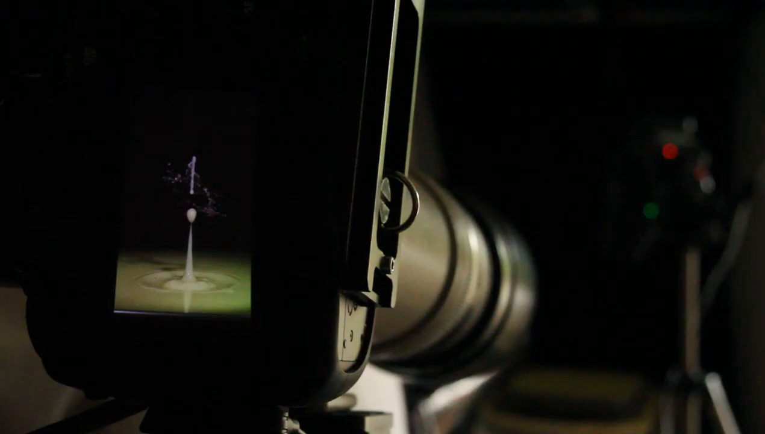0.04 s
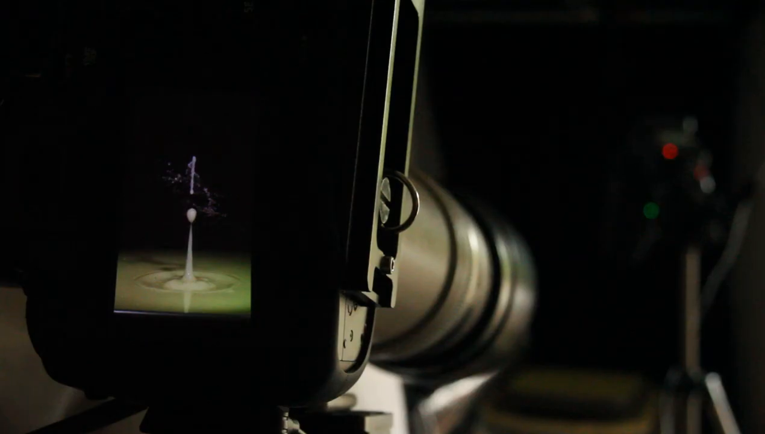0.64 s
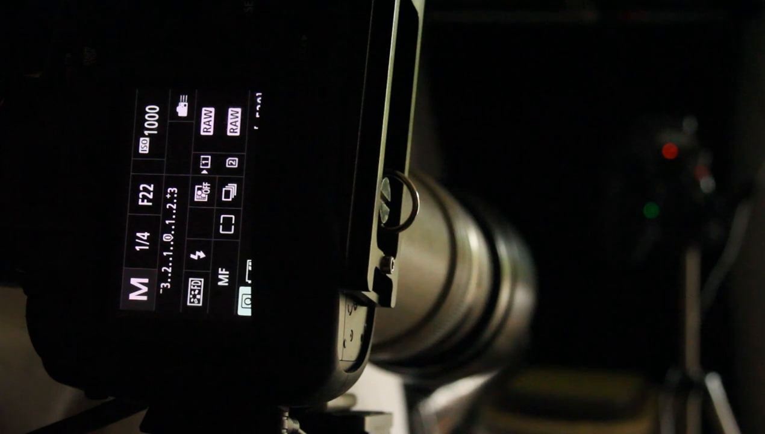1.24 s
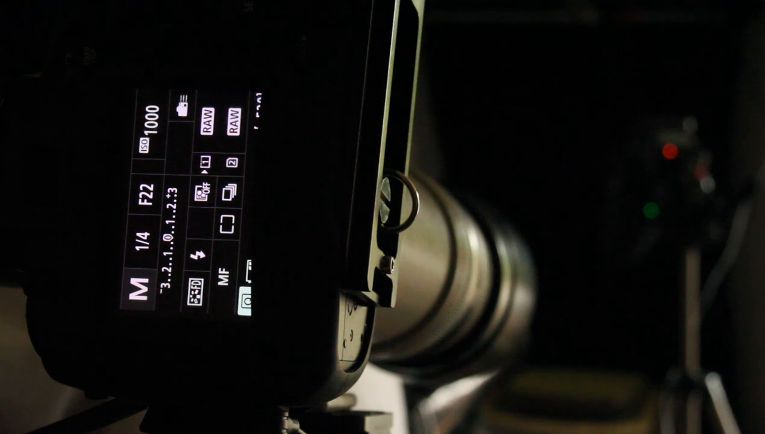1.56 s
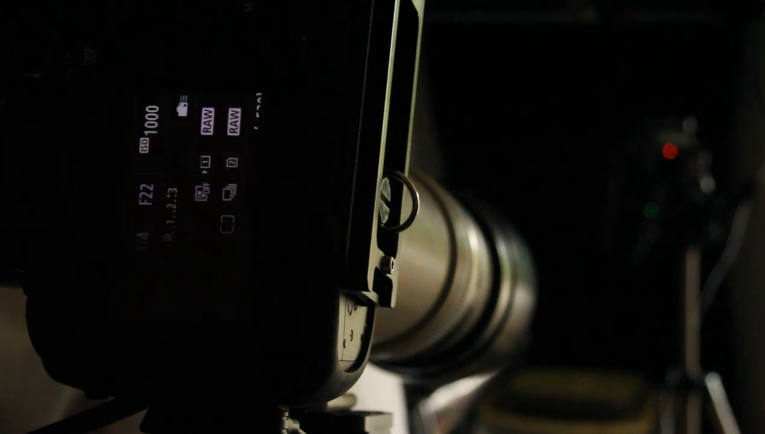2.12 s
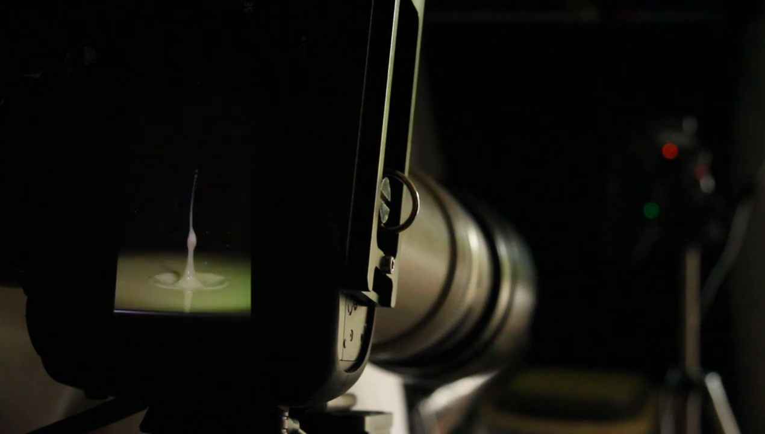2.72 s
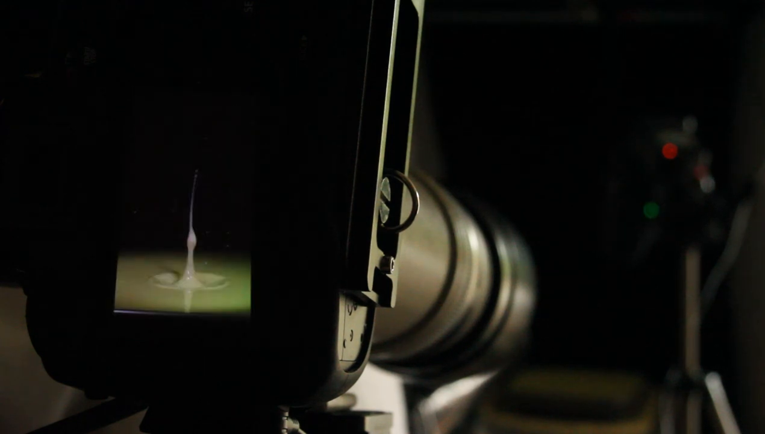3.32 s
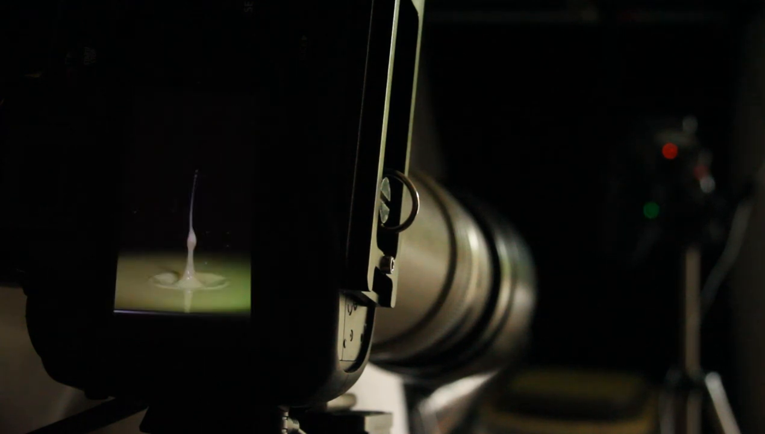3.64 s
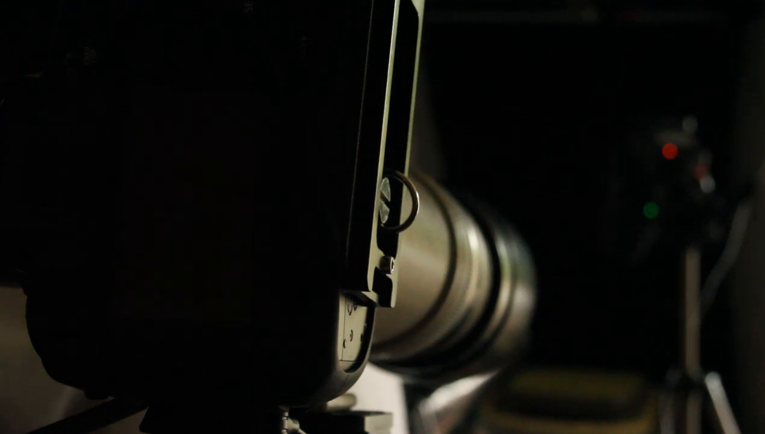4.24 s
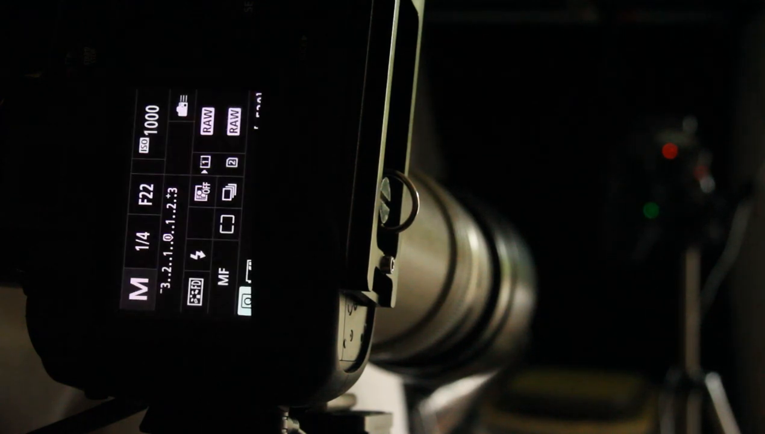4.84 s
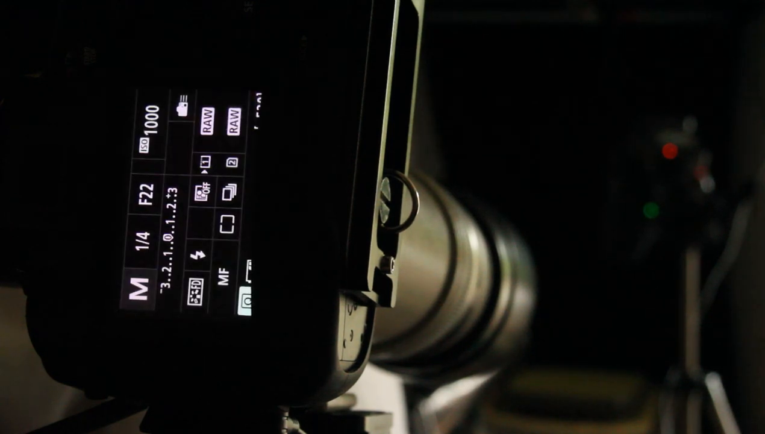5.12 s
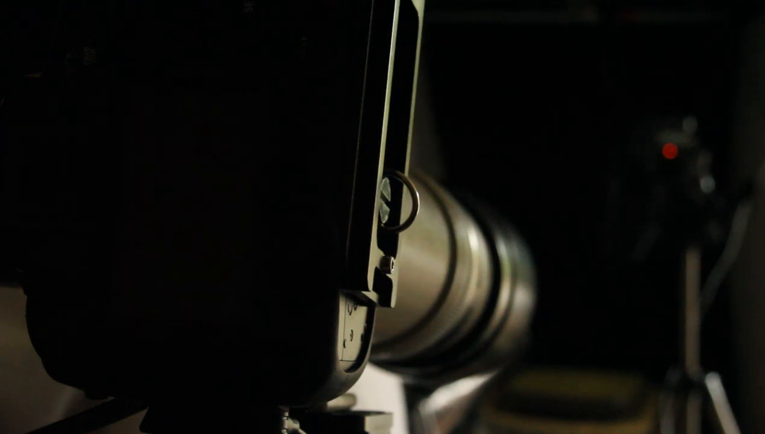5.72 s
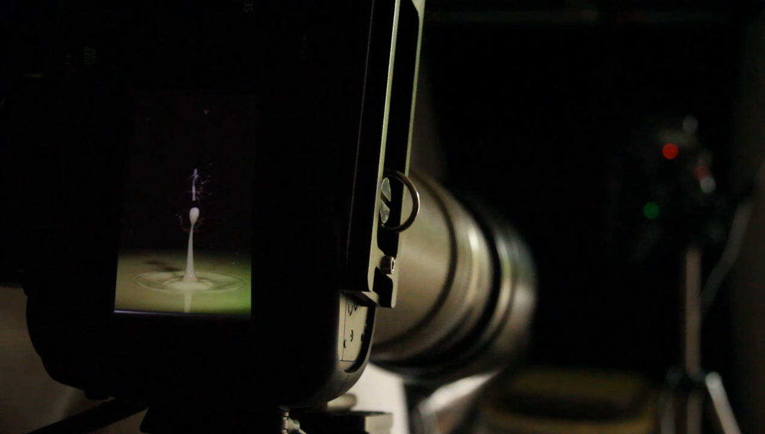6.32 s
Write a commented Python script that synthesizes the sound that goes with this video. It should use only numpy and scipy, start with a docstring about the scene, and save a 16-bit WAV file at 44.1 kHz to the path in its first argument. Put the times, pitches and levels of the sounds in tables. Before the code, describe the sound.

Two rounds of quick, sharp mechanical clicks from a solenoid valve and a camera's mirror and shutter, over faint room hiss.

```python
"""A quiet room hisses, electronics whine faintly, and something rustles as it is handled.
Then a water-drop photo rig fires twice. Each time, the spring of a trigger switch pings, and a
solenoid valve (a plunger pulled by a magnet) snaps open and falls softly shut for each of two drops.
A reflex camera throws up its mirror, runs its shutter and resets: its parts hit each other, crack
through the case and ring. Two soft bumps come at the end."""
import sys
import numpy as np
from scipy import signal
from scipy.fft import rfft, irfft
from scipy.io import wavfile
from scipy.ndimage import uniform_filter1d

SR = 44100
rng = np.random.default_rng(int(sys.argv[2]) if len(sys.argv) > 2 else 0)


def master_out(mix):
    """Clip the mix to full scale and print it as 16-bit PCM to the path in sys.argv[1]."""
    frames = np.transpose(np.atleast_2d(mix))
    ceiling = np.clip(frames, -1, 1)
    pcm = np.round(ceiling * 32767).astype(np.int16)
    wavfile.write(sys.argv[1], SR, pcm)


N = 289428
RING_TIME = np.arange(SR // 2) / SR   # seconds since a blow

# A colour says how strong each pitch is. A mode is one note a part rings at; t60 is its time to fade 60 dB.
# echoes from nearby surfaces (delay [s], level [dB])
ROOM_ECHOES = [(.0019, -4), (.0024, -7), (.0051, -10), (.0062, -5), (.0067, -9), (.0086, -11)]
# how long the room rings (frequency [Hz], t60 [s])
ROOM_DECAY = [(150, 0.14), (500, 0.18), (1500, 0.22), (4000, 0.15), (9000, 0.17), (15000, 0.15)]
# room air and hiss (frequency [Hz], level [dB])
AIR_COLOUR = [(25, -12), (45, -8), (80, -4), (110, -7), (170, -2.5), (250, 0), (450, -3), (620, -2.5),
              (900, -5), (2000, -8), (3400, -7.5), (5000, -10.5), (10000, -13.5), (14000, -19),
              (16000, -21)]
# the room's low rumble (low edge [Hz], high edge [Hz], level [dB])
RUMBLE_BANDS = [(220, 300, -77), (300, 400, -77.5), (400, 500, -76.5), (540, 680, -78)]
# whine of the electronics (frequency [Hz], level [dB])
WHINE_TONES = [(3008, -73.5), (15644, -84)]

# how the rustle rises and falls (time [s], level [dB])
RUSTLE_LEVELS = [(.4, -76), (.65, -65.5), (.82, -66), (1, -73), (1.1, -67), (1.3, -76), (1.48, -73),
                 (1.57, -62), (1.62, -72)]
# the handled thing snags (time [s], level [dB])
RUSTLE_SNAGS = [(.676, -36), (0.863, -34.5), (.947, -38), (1.07, -34)]
# colour of the rustle (frequency [Hz], level [dB])
RUBBING_COLOUR = [(150, -7), (600, -3), (1400, 5.5), (2300, 0.5), (3500, 1), (4500, -4), (9000, -1),
                  (15000, -14)]

# soft scuffs of handled plastic (time [s], level [dB])
SCUFFS = [(1.524, -49), (1.563, -49.5), (1.582, -50), (1.686, -48)]
# colour of the scuffs (frequency [Hz], level [dB])
SCUFF_COLOUR = [(200, 2), (600, 3), (1300, 4), (2400, -4), (3500, 8), (4300, 2), (9000, -3), (15000, -24)]
# the trigger switch is pressed (time [s], level [dB])
PRESSES = [(1.6118, -40), (4.8785, -43)]
# the switch's spring (frequency [Hz], level [dB], t60 [s])
SPRING_MODES = [(4000, -7.5, 0.15), (3900, 0, 0.009), (3300, 2, 0.007)]

# the valve opens to let a drop go (time [s], level [dB])
VALVE_OPENINGS = [(1.7128, -7.5), (1.8646, -8.5), (4.9925, -7.5), (5.143, -8)]
# colour of the valve's snap (frequency [Hz], level [dB])
SNAP_COLOUR = [(150, -31), (300, -15), (580, -18.5), (900, -16), (1200, -21.5), (1550, -16.5), (2300, -13),
               (3500, -8), (4600, -9.5), (6000, -4), (8800, -1.5), (10500, 0.5), (12300, -4), (13500, -12),
               (14500, -14), (16000, -29)]
# pitches the valve's housing boosts (frequency [Hz], width [Hz], boost [dB])
HOUSING_PEAKS = [(2230, 120, 7), (3560, 120, 5), (5850, 80, 5), (6450, 110, 7), (6900, 130, 6),
                 (8290, 60, 6), (8750, 220, 5), (9230, 110, 9), (10350, 90, 5), (10620, 80, 5),
                 (11000, 80, 6), (12200, 130, 8)]
# the valve's steel shell, knocked by the plunger (frequency [Hz], level [dB], t60 [s])
STEEL_SHELL_MODES = [(580, -34.5, 0.033), (1530, -45, 0.11), (2200, -44.5, 0.14), (2350, -39, .05),
                     (2595, -50, 0.088)]
# the arm holding the valve (frequency [Hz], level [dB], t60 [s])
ARM_MODES = [(327, -25.5, 0.055), (420, -37.5, 0.072)]
# colour of the plunger's tap on its rubber seat (frequency [Hz], level [dB])
TAP_COLOUR = [(150, -10), (600, 8), (900, 1.5), (1200, -2), (1550, 1), (3300, -4.5), (6000, -0.5),
              (14000, -31)]
# the rubber seat and its mount (frequency [Hz], level [dB], t60 [s])
RUBBER_SEAT_MODES = [(826, 0, 0.17), (590, 2, 0.059), (314, -5, 0.18), (1510, -13, .12)]

# photographs (mirror rises [s], camera resets [s], extra lever ring as the mirror rises [dB])
PHOTOS = [(2.124, 2.423, 3.5), (5.4394, 5.7409, 2)]
# parts sliding before they strike (frequency [Hz], level [dB])
SCRAPE_COLOUR = [(200, -15), (900, -6.5), (2500, -8), (3800, 4), (5500, 2), (9000, -3.5), (12000, -14),
                 (16000, -23)]
# A contact is one part hitting another. These six tables list them as
# (time [s], blow [dB], extra treble [dB], lever ring [dB], latch ring [dB]).
# Timed from the start of their own movement:
MIRROR_UP_CONTACTS = [(0, -10, 2, -16, -25), (.004, -11, 8, -19, -16), (.0075, -8, 1, -20, -22),
                      (0.0104, -5.5, 5.5, -21, -15.5), (0.0154, -10.5, -12, -37, -28),
                      (.0238, -14, -23, -45, -24)]
SHUTTER_OPEN_CONTACTS = [(0, -10, -30, -29, -49), (.0045, -5.5, -13, -28, -37), (.008, -7.5, -16, -32, -42),
                         (0.0131, -15, -16, -36, -38)]
SHUTTER_CLOSE_CONTACTS = [(0, -17, -2, -24, -22), (.0038, -12.5, 2, -24, -8)]
MIRROR_DOWN_CONTACTS = [(0, -7, 5.5, -29, -18), (.0028, -9.5, -14, -14, -15), (.006, -9, -8, -35, -19),
                        (0.0104, -17.5, -18, -34, -33), (.019, -13, -22, -43, -38)]
LAST_LATCH_CONTACTS = [(0, -21, -3, -42, -23), (.0047, -18.5, 1.5, -36, -39), (.0094, -19.5, -16, -50, -38)]
# Timed from the start of the scene: the cocking lever rattles as it readies the shutter again
COCKING_CONTACTS = [(2.429, -15, -5, -29, -19), (2.4304, -15, -8, -26, -19), (2.437, -19, -3, -16.5, -20),
                    (2.4424, -19, -6, -17, -24), (5.7455, -12, -7, -26, -21), (5.7488, -14, 0, -12.5, -19),
                    (5.755, -19, -12, -17, -20), (5.7595, -24, -10, -8.5, -30)]
# a small catch ticks while the shutter is open (same columns as COCKING_CONTACTS)
CATCH_CONTACTS = [(2.305, -47, 6, -60, -43), (5.583, -41, 10, -60, -39)]
# colour of the camera's case (frequency [Hz], level [dB])
CAMERA_COLOUR = [(50, -70), (105, -51), (160, -10), (250, -16.5), (350, -13), (480, -15.5), (680, -5.5),
                 (1000, -4.5), (1500, -5), (4000, -2.5), (7000, -1), (11000, .5), (13000, -5.5),
                 (16000, -29)]
# pitches the case boosts (frequency [Hz], width [Hz], boost [dB])
CAMERA_PEAKS = [(657, 35, 5), (2030, 50, 3), (2770, 60, 3), (3760, 100, 3), (4240, 60, 3), (4500, 120, 3),
                (4810, 110, 5), (5240, 60, 6), (5890, 150, 3), (8090, 60, 3), (8500, 60, 3), (9650, 90, 4),
                (10130, 90, 4), (10410, 60, 4)]
# camera parts that ring (frequency [Hz], level [dB], t60 [s])
MIRROR_LEVER_MODES = [(3696, -9, 0.015), (3920, -2.5, 0.014), (4160, -5, .012), (4800, -12, 0.017),
                      (5230, -8, 0.012)]
SMALL_LATCH_MODES = [(7740, -4, 0.01), (8540, -3.5, 0.01), (8740, -4.5, 0.013), (9300, -2, 0.0075)]
MIRROR_BOX_MODES = [(659, -28.5, 0.066), (3770, -27, 0.052), (10060, -20, 0.051)]   # as the mirror swings up
ROCKING_MODES = [(159, 4, 0.057), (207, 6, 0.046), (254, -0.5, 0.054)]   # the whole camera
SHUTTER_FRAME_MODES = [(580, 0, 0.11), (1000, -9, .09), (1045, -13, 0.21), (1175, -7, .12),
                       (2000, -1, 0.11), (2125, -7, .12), (2433, -9, .12), (4330, -5, .06)]
MIRROR_LANDING_MODES = [(2785, 0, .12), (4270, -4, .08), (5230, -2, .11), (9640, -3, .07)]   # the mirror, back on its stop
LAST_LATCH_MODES = [(3700, -11, .02), (4680, -13, .02), (4830, -13, .02), (8600, -5, .008),
                    (8850, -2, .009), (9080, -5, .008), (12900, -9, .008), (13400, -10, .008)]
SETTLING_MODES = [(690, -2, .07), (900, -2, .07), (1220, 0, .04), (1400, 0, .04), (2130, -1, .05),
                  (2330, -4, .05)]   # a dull knock as the mechanism settles
# the mirror jolts the camera as it starts and stops (delay [s], level [dB])
MIRROR_UP_JOLTS = [(.001, -39), (.019, -39)]
MIRROR_DOWN_JOLTS = [(0, -46), (.027, -45)]

# soft bumps near the rig (time [s], level [dB])
SOFT_BUMPS = [(6.303, -23), (6.518, -30)]
# their dull colour (frequency [Hz], level [dB])
THUD_COLOUR = [(100, -14), (400, 0), (850, -1), (1700, -5), (2400, -15), (8000, -32)]
# pitches the bumped thing boosts (frequency [Hz], width [Hz], boost [dB])
THUD_PEAKS = [(420, 70, 6), (800, 100, 4), (1650, 120, 6)]

MIRROR_DOWN_LAG_S, LATCH_LAG_S = .0255, .096   # after the camera's reset


def from_db(db):
    """Turn decibels into a number to multiply by."""
    return 10 ** (np.asarray(db) / 20)


def unit(x):
    """Scale a sound to an energy of one."""
    return x / np.sqrt(np.sum(x ** 2) + 1e-20)


def at_hz(points, hz):
    """Read between a table's rows, giving every octave equal space."""
    known_hz, values = np.transpose(points)
    return np.interp(np.log(hz + 0.00057), np.log(known_hz), values)


def dying(t60):
    """A fade that is 60 dB down after t60 seconds."""
    return np.exp(-np.log(1000) * RING_TIME / t60)


def rising(rise_s):
    """A swell from zero towards one."""
    return 1 - np.exp(-RING_TIME / rise_s)


def wander(rate_hz):
    """A smooth random drift with a spread of one."""
    width = round(SR / rate_hz)
    slow = uniform_filter1d(uniform_filter1d(rng.standard_normal(N), width), width)
    return slow / slow.std()


def add(track, s, sound):
    """Mix a sound into a track, starting at s seconds."""
    i = round(s * SR)
    track[i:i + len(sound)] += sound[:len(track) - i]


def through(x, response):
    """Pass a sound through an object or room, given its response to one click."""
    return signal.fftconvolve(x, response)[:len(x)]


def brighten(x, db, corner_hz):
    """Raise or lower the treble above corner_hz."""
    dull = signal.lfilter(*signal.butter(1, corner_hz, fs=SR), x)
    return dull + from_db(db) * (x - dull)


def body(colour, peaks=(), size=8192):
    """How an object answers one click: a broad colour with a few boosted pitches."""
    hz = np.arange(size // 2 + 1) * SR / size
    boost_db = sum(lift / (1 + (2 * (hz - centre) / width) ** 2) for centre, width, lift in peaks)
    cepstrum = irfft(np.log(from_db(at_hz(colour, hz) + boost_db)))[:size // 2]
    cepstrum[1:] *= 2   # minimum phase: nothing sounds before the blow
    return unit(irfft(np.exp(rfft(cepstrum, size))))


def ring(modes, rise_s):
    """A struck part's notes build up quickly, then fade."""
    notes = sum(from_db(db) * dying(t60) * np.sin(2 * np.pi * (hz * RING_TIME + rng.random()))
                for hz, db, t60 in modes)
    return rising(rise_s) * notes


def struck(events, modes, rise_s):
    """The same part rings at every (time, level) event."""
    out, sound = np.zeros(N), ring(modes, rise_s)
    for s, db in events:
        add(out, s, from_db(db) * sound)
    return out


def puffs(events, shape):
    """A fresh burst of noise, swelling and fading as shape does, at every (time, level) event."""
    out = np.zeros(N)
    for s, db in events:
        add(out, s, from_db(db) * unit(rng.standard_normal(len(shape)) * shape))
    return out


def crack(t60, size=1024):
    """The tiny rattle of one hard contact, about equally strong at all pitches."""
    decay = dying(t60)[:size]
    burst = rng.standard_normal(size) * decay
    limit = 1.5 * unit(decay)
    for _ in range(3):
        even = irfft(np.exp(1j * np.angle(rfft(burst))))   # level out the pitches
        burst = np.clip(even, -limit, limit)   # keep it fading
    return unit(burst)


def room(echo_db, tail_db, build_s, treble_db=0):
    """How the room answers a click: the click itself, nearby echoes and a tail fading band by band."""
    size, edges = len(RING_TIME), np.geomspace(60, 18000, 13)
    hz, white = np.fft.rfftfreq(size, 1 / SR), rfft(rng.standard_normal(size))
    tail = np.zeros(size)
    for low, high in zip(edges, edges[1:]):
        band = irfft(white * (hz >= low) * (hz < high), size)
        tail += band * dying(at_hz(ROOM_DECAY, np.sqrt(low * high)))
    response = brighten(from_db(tail_db) * unit(tail * rising(build_s)), treble_db, corner_hz=2520)
    response[0] += 1   # the direct sound
    for delay, db in ROOM_ECHOES:
        add(response, delay, from_db(db + echo_db) * crack(t60=0.0012))
    return response


def room_air(hiss_db=-61.2, waver_db=3.5):
    """The room's steady hiss and a low rumble that wavers band by band."""
    hiss = through(rng.standard_normal(N), body(AIR_COLOUR))
    air = from_db(hiss_db) * np.sqrt(N) * unit(hiss)
    for low_hz, high_hz, db in RUMBLE_BANDS:
        bandpass = signal.butter(2, [low_hz, high_hz], "band", fs=SR, output="sos")
        band = signal.sosfilt(bandpass, rng.standard_normal(N))
        air += from_db(db + waver_db * wander(rate_hz=7)) * band / band.std()
    return air


def whine():
    """Electronics give off two thin, steady tones."""
    t = np.arange(N) / SR
    return sum(np.sqrt(2) * from_db(db) * np.sin(2 * np.pi * hz * t) for hz, db in WHINE_TONES)


def rustle(clump_db=3):
    """Something handled rubs faintly, in uneven clumps, and snags now and then."""
    times, levels = np.transpose(RUSTLE_LEVELS)
    level_db = np.interp(np.arange(N) / SR, times, levels, left=-120, right=-120)
    rubbing = from_db(level_db + clump_db * wander(rate_hz=45)) * rng.standard_normal(N)
    snags = puffs(RUSTLE_SNAGS, dying(t60=0.029))
    return through(rubbing + snags, body(RUBBING_COLOUR))


def switch():
    """The trigger's plastic scuffs softly under the hand and its small spring pings."""
    scuffs = through(puffs(SCUFFS, rising(.003) * dying(.035)), body(SCUFF_COLOUR))
    scuffs = through(scuffs, room(echo_db=20, tail_db=9, build_s=0.0037))
    return scuffs + struck(PRESSES, SPRING_MODES, rise_s=0.000065)


def valve(travel_s=0.002004, arm_lag_s=0.0112, open_s=.0564, seat_db=-47.5):
    """The plunger snaps open, ringing the shell and arm, then falls back on its rubber seat."""
    snaps, taps = np.zeros(N), np.zeros(N)
    paths = room(echo_db=0, tail_db=2, build_s=.004)
    snap = through(paths, np.convolve(crack(t60=.002), body(SNAP_COLOUR, HOUSING_PEAKS)))
    closings = [(s + open_s, seat_db) for s, _ in VALVE_OPENINGS]
    for s, db in VALVE_OPENINGS:
        add(snaps, s, from_db(db + 1) * snap)
    for s, db in closings:
        add(taps, s, from_db(db + 15) * crack(t60=0.033))
    arm = struck([(s + arm_lag_s, db) for s, db in VALVE_OPENINGS], ARM_MODES, rise_s=0.012)
    shell = struck([(s + travel_s, db) for s, db in VALVE_OPENINGS], STEEL_SHELL_MODES, rise_s=0.00076)
    taps = through(through(taps, body(TAP_COLOUR)), room(echo_db=6, tail_db=2.5, build_s=0.0067))
    return snaps + shell + arm + taps + struck(closings, RUBBER_SEAT_MODES, rise_s=0.0024)


def scrapes(release_s=.009, curtain_s=.0072, level_db=-32.5):
    """The release lever slides before the mirror rises; the closing curtain slides before the reset."""
    out = np.zeros(N)
    for rise, reset, _ in PHOTOS:
        for end, length in ((rise, release_s), (reset, curtain_s)):
            speed = np.sin(np.linspace(0, np.pi, round(length * SR)))
            add(out, end - length, from_db(level_db) * speed * rng.standard_normal(len(speed)))
    return through(through(out, body(SCRAPE_COLOUR)), room(echo_db=-4.5, tail_db=4, build_s=.004))


def movement(start, contacts, extra_lever_db=0):
    """The contacts of one movement, set going at start seconds."""
    return [(start + delay, db, treble_db, lever_db + extra_lever_db, latch_db)
            for delay, db, treble_db, lever_db, latch_db in contacts]


def shutter_cycles(open_lag_s=.046, close_lead_s=.004, frame_lag_s=.015, frame_db=-35):
    """When parts hit in each photo: mirror up, shutter open and shut, recocking, mirror down, latch."""
    contacts, jolts, frame_hits = CATCH_CONTACTS + COCKING_CONTACTS, [], []
    for rise, reset, extra_lever_db in PHOTOS:
        contacts += movement(rise, MIRROR_UP_CONTACTS, extra_lever_db)
        contacts += movement(rise + open_lag_s, SHUTTER_OPEN_CONTACTS)
        contacts += movement(reset - close_lead_s, SHUTTER_CLOSE_CONTACTS)
        contacts += movement(reset + MIRROR_DOWN_LAG_S, MIRROR_DOWN_CONTACTS)
        contacts += movement(reset + LATCH_LAG_S, LAST_LATCH_CONTACTS)
        jolts += [(rise + delay, db) for delay, db in MIRROR_UP_JOLTS]
        jolts += [(reset + delay, db) for delay, db in MIRROR_DOWN_JOLTS]
        frame_hits.append((rise + open_lag_s + frame_lag_s, frame_db))
    return contacts, jolts, frame_hits


def camera(mirror_db=-31.5, last_latch_db=-22.5, rebound_s=.0037, settle_lag_s=.008, settle_db=-38):
    """Each contact cracks through the case and rings the metal parts; the mirror rocks the camera."""
    cracks, metal, case = np.zeros(N), np.zeros(N), body(CAMERA_COLOUR, CAMERA_PEAKS)
    contacts, jolts, frame_hits = shutter_cycles()
    for s, db, treble_db, lever_db, latch_db in contacts:
        blow = brighten(crack(t60=0.0092), treble_db, corner_hz=5950)   # harder contacts are brighter
        # every spot on the case has its own way through the room
        paths = room(echo_db=-3, tail_db=0.2, build_s=0.0037, treble_db=-4.5)
        add(cracks, s, from_db(db + 4) * through(paths, np.convolve(case, blow)))
        add(metal, s, from_db(lever_db) * ring(MIRROR_LEVER_MODES, rise_s=0.0011))
        add(metal, s, from_db(latch_db) * ring(SMALL_LATCH_MODES, rise_s=0.00088))
    for rise, reset, _ in PHOTOS:
        add(metal, rise, ring(MIRROR_BOX_MODES, rise_s=0.0042))
        landing = from_db(mirror_db) * ring(MIRROR_LANDING_MODES, rise_s=0.002)
        add(metal, reset + MIRROR_DOWN_LAG_S, landing)
        for delay in (0, rebound_s):   # the last latch catches, then bounces once
            latch = from_db(last_latch_db) * ring(LAST_LATCH_MODES, rise_s=0.0003)
            add(metal, reset + LATCH_LAG_S + delay, latch)
    metal = through(metal, room(echo_db=-17, tail_db=-10, build_s=.005))
    knocks = [(reset + LATCH_LAG_S + settle_lag_s, settle_db) for _, reset, _ in PHOTOS]
    settling = struck(knocks, SETTLING_MODES, rise_s=0.0047)
    bass_cut = signal.butter(2, 110, "high", fs=SR, output="sos")
    rocking = signal.sosfilt(bass_cut, struck(jolts, ROCKING_MODES, rise_s=0.0052))
    mechanism = scrapes() + cracks + metal + rocking + settling
    return mechanism + struck(frame_hits, SHUTTER_FRAME_MODES, rise_s=.002)


def bumps():
    """Something near the rig is bumped softly: dull thuds that swell and fade."""
    return through(puffs(SOFT_BUMPS, rising(.02) * dying(.14)), body(THUD_COLOUR, THUD_PEAKS))


def scene():
    """All the sounds together in one channel."""
    return (switch() + valve() + camera() + rustle() + bumps() + room_air() + whine())[None]


def record(dry):
    """Cut the highest treble steeply, above 16300 Hz."""
    return signal.sosfilt(signal.ellip(10, .1, 80, 16300, fs=SR, output="sos"), dry)


dry = scene()
out = record(dry)
master_out(out)
```